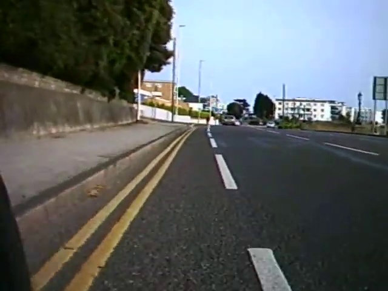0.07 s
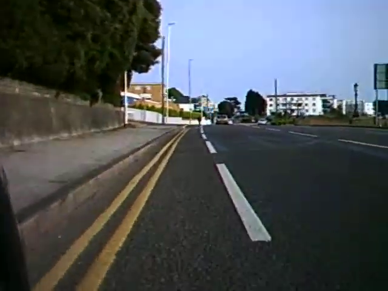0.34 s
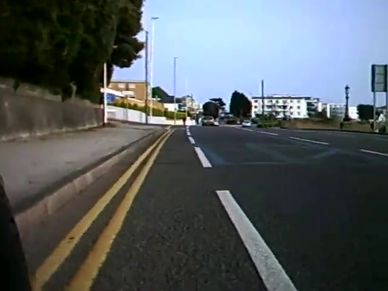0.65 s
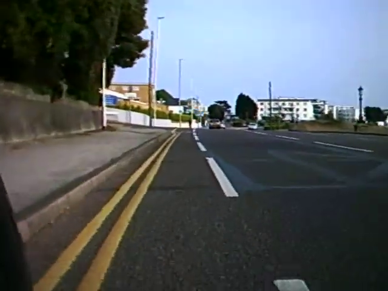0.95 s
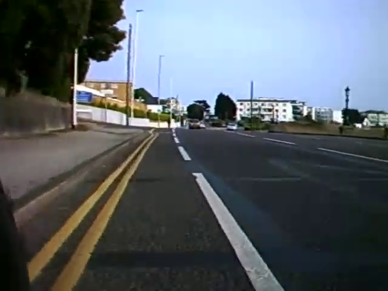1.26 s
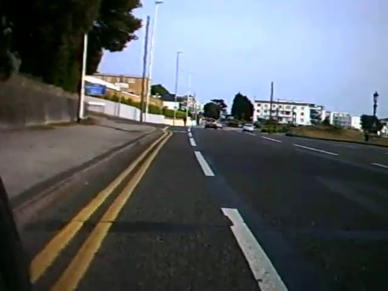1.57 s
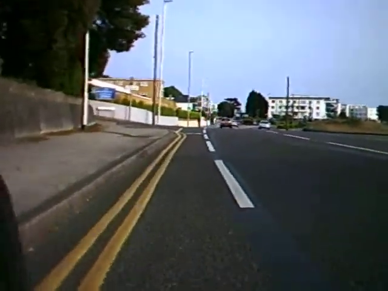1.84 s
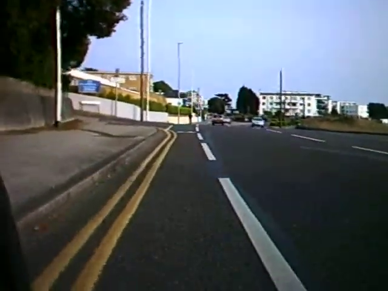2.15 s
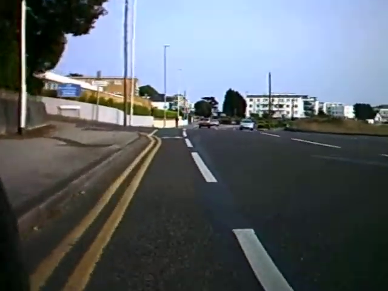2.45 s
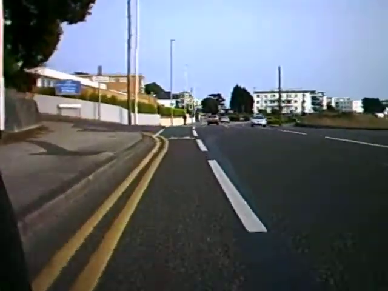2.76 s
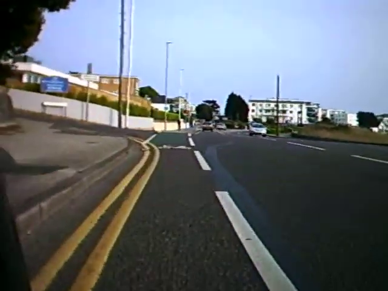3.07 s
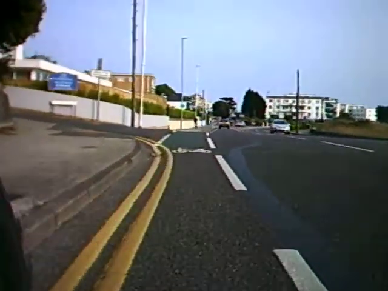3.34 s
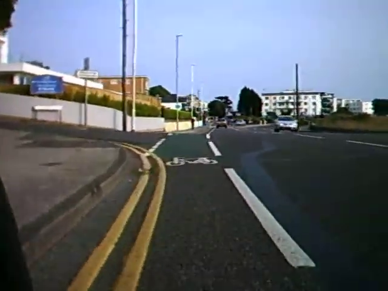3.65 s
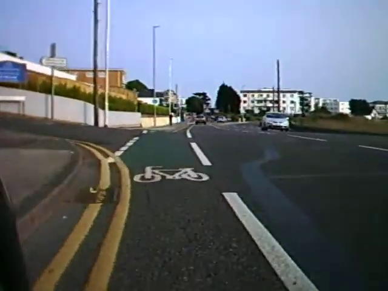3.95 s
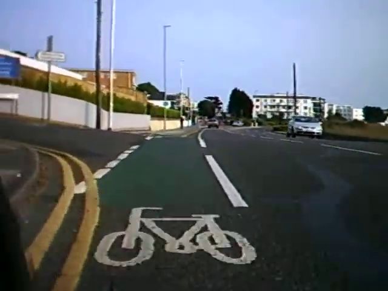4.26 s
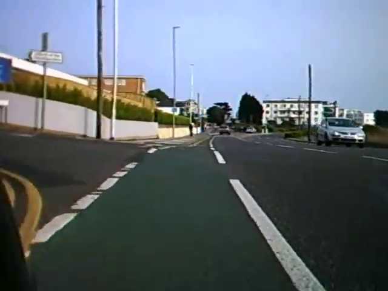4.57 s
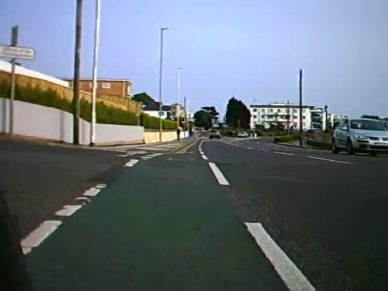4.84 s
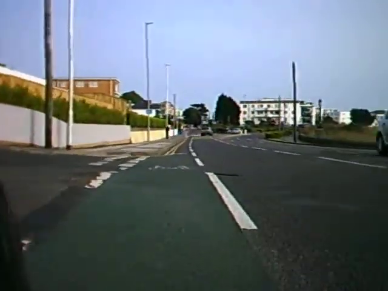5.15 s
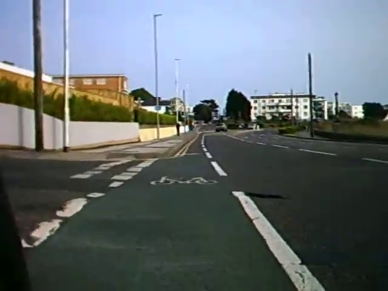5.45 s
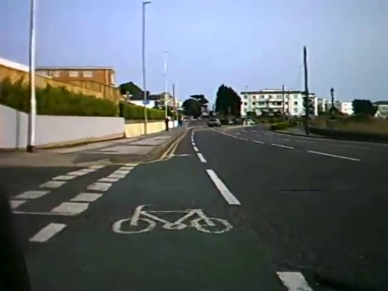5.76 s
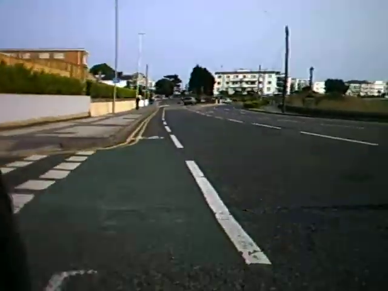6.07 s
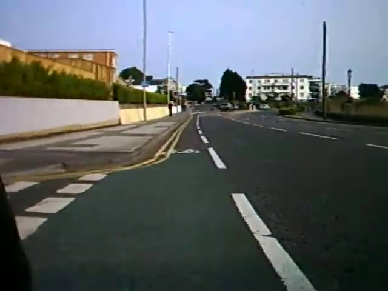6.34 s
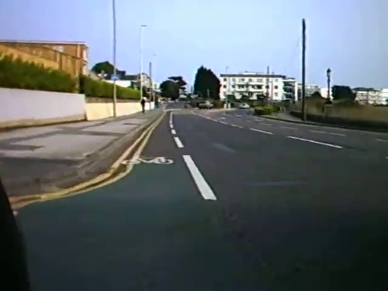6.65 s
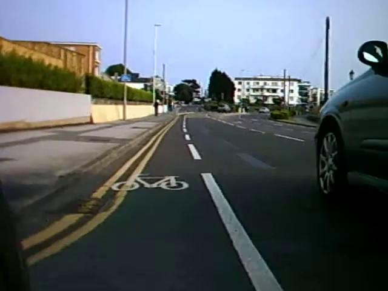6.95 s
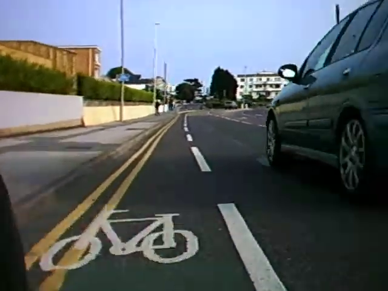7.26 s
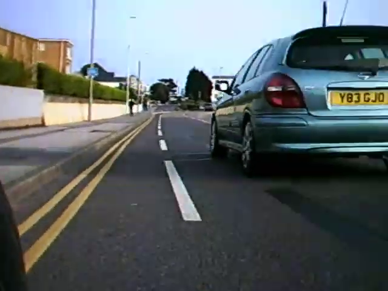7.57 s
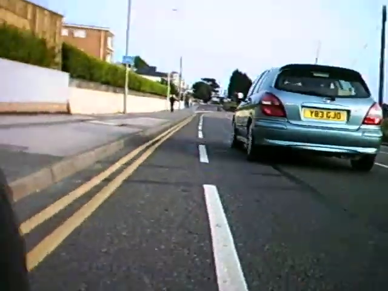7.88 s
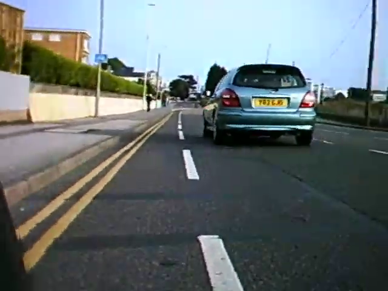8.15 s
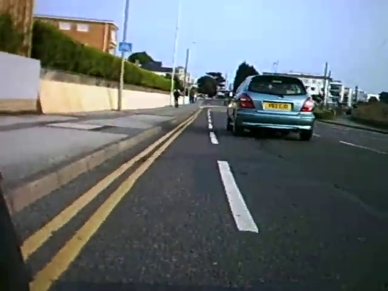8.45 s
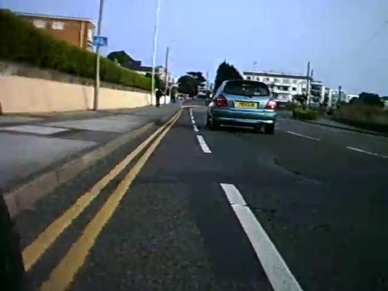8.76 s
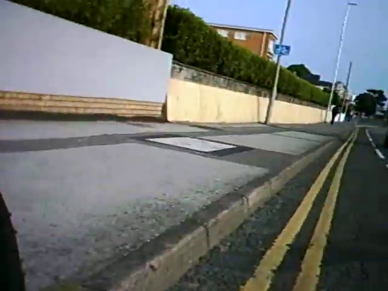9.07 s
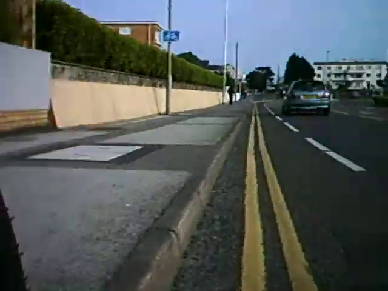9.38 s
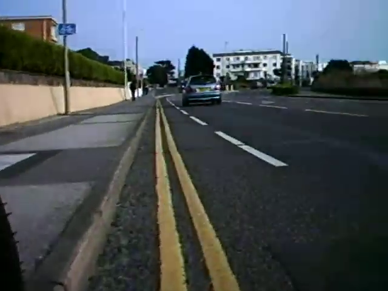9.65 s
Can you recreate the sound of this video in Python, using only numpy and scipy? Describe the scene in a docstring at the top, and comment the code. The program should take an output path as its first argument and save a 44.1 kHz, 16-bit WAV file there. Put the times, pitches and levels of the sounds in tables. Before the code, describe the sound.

A bicycle rumbles over rough asphalt with wind on the microphone, knocking and squeaking over bumps, then a brake rubs.

```python
"""A bicycle rolls on asphalt, a small camera fixed to its frame. From the start, road grain bounces the
tyres, shakes the frame and rings the camera case; wind buffets the microphone. From about 1 s, bumps
bring ticks, jolts and later knocks, and the camera mount squeaks, most densely at 6-7 s.
From 7.9 s a brake pad rubs the rim, its tones sinking as the wheel slows.
The narrow-band microphone saturates on the loudest peaks."""
import sys
import numpy as np
from scipy.fft import rfft, irfft, next_fast_len
from scipy.io import wavfile
from scipy.ndimage import map_coordinates

SR = 44100
rng = np.random.default_rng(int(sys.argv[2]) if len(sys.argv) > 2 else 0)


def store_wav(level_fs):
    """Save 16-bit WAV to argv[1]."""
    pcm = np.round(np.clip(np.atleast_2d(level_fs), -1, 1) * 32767)
    wavfile.write(sys.argv[1], SR, pcm.T.astype(np.int16))


N = 432621
T = np.arange(N) / SR

# noise spectra: (frequency [Hz], density [dB])
WIND_SPECTRUM = [(8, -16), (18, -3), (30, -5), (55, -0.5), (120, -13), (300, -37)]
TICK_SPECTRUM = [(900, -26), (1400, 5.5), (2000, -1), (2500, 2.5), (3000, 5.5), (4200, -9.5), (5000, -40)]
PAD_SPECTRUM = [(500, -47), (850, -8), (914, -10), (984, -6), (1150, -8), (1370, -7), (1590, -9),
                (1640, -22), (1830, -32.5), (2270, -24.5), (2580, -23.5), (2830, -18.5), (3130, -27),
                (3430, -23), (4160, -36), (5410, -87.5), (9150, -120)]
TYRE_SPECTRUM = [(42, -40.5), (57, -19), (65, -5.5), (71, 6.5), (79, 1), (90, -1), (105, -11.5),
                 (140, -18.5), (250, -52.5)]
FRAME_SPECTRUM = [(70, -38.5), (112, -5.5), (138, -4.5), (155, 0), (172, -1), (200, -5.5), (235, -6.5),
                  (300, -13), (345, -10.5), (385, -6), (440, -10.5), (510, -21.5), (900, -55)]
ROAD_SPECTRUM = [(250, -26.5), (500, -4.5), (640, 3.5), (780, 1.5), (890, -8.5), (1300, -14.5),
                 (1850, -23.5), (4000, -42)]
CASE_SPECTRUM = [(800, -44), (950, -19.5), (1070, -7), (1180, 2.5), (1310, 0.5), (1420, -10), (1560, -23),
                 (1850, -36), (2050, -32.5), (2500, -33.5), (2830, -25), (3100, -33), (3400, -32),
                 (4200, -57.5)]
# resonances: (frequency [Hz], width [Hz], gain [dB])
JOLT_MODES = [(75, 14, -1.5), (152, 20, 4), (400, 83, -6.5)]
CASE_MODES = [(483, 100, -7), (1158, 110, 10.5), (1320, 140, 5), (1880, 47, -11), (2470, 150, -12),
              (2870, 92, -8), (3260, 130, -18)]
MOUNT_MODES = [(982, 22, 3.5), (1433, 55, 0), (2240, 28, -10), (2320, 62, -6), (2710, 210, -13.5),
               (3880, 190, -26.5)]
RIM_MODES = [(390, 70, -11.5), (998, 29, 1), (1119, 106, 4), (1330, 135, 1.5), (1506, 51, -13),
             (1986, 60, -20.5), (2310, 91, -17.5), (2825, 110, -16.5), (3387, 110, -19.5)]
# gusts on the microphone: (middle [s], length [s], level [dB])
WIND_GUSTS = [(1.49, .7, -38.5), (6.025, .2, -28), (6.533, 1, -28.5), (9.591, .8, -39)]
# impacts over bumps: (time [s], level [dB])
FRAME_JOLTS = [(1.292, -9), (3.191, -4.5), (3.213, -7.5), (4.561, -13.5), (6.022, -19.5), (6.136, -17.5),
               (6.425, -16), (6.62, -14.5), (6.78, -13.5), (9.12, -9), (9.43, -7.5)]
CASE_KNOCKS = [(3.039, 1), (3.2223, 3.5), (3.2264, -1.5), (3.376, -13.5), (6.012, -13.5), (6.056, -9),
               (6.184, -8), (6.234, -12), (6.559, -17), (6.676, -9.5), (6.7895, -2), (6.803, -7),
               (6.882, -15)]
PART_TICKS = [(0.817, -32.5), (1.2945, -25.5), (1.489, -17.5), (3.036, -14.5), (3.153, -25.5), (5.973, -26),
              (6.0273, -16.5), (6.1506, -18.5), (6.1841, -15), (6.2326, -13.5), (6.6012, -21.5),
              (6.6363, -22.5), (6.655, -19.5), (6.6783, -24.5), (6.772, -20), (6.788, -19), (6.8057, -16),
              (6.8314, -24), (7.2323, -19.5), (7.343, -21.5), (7.5637, -26.5), (9.2986, -13.5)]
# slips of the mount: (time [s], length [s], pitch [Hz], level [dB])
MOUNT_SLIPS = [(1.32, 0.026, 1414, -10), (1.347, 0.028, 1448, -12.5), (1.373, 0.02, 1410, -14.5),
               (1.586, 0.019, 1388, -10.5), (1.645, 0.015, 1412, -17), (2.317, 0.017, 1415, -12.5),
               (2.35, 0.034, 1413, -7.5), (2.373, 0.032, 1383, -11), (2.402, .022, 1417, -11.5),
               (3.12, 0.014, 1458, -18), (3.908, 0.019, 1401, -13.5), (4.14, 0.018, 1413, -20),
               (4.955, 0.023, 1410, -13), (4.985, 0.022, 1425, -15), (5.92, .022, 1420, -9),
               (6.081, .026, 1438, -9), (6.144, 0.023, 1375, -5.5), (6.202, .02, 1426, -9.5),
               (6.323, 0.027, 1386, -14), (6.966, 0.023, 1402, -12), (7.684, 0.031, 1420, -7.5),
               (7.711, 0.03, 1405, -10)]
# rim ripples: (frequency at cruising speed [Hz], level [dB])
RIM_RIPPLES = [(560, 5.5), (700, 7), (1200, -4), (1330, -11.5), (1490, -7), (1630, -5.5), (1800, -21),
               (1950, -4.5), (2250, -8), (2750, -3.5), (3600, -3.5), (4700, -10.5)]
# radiation of the stiff rim: (frequency [Hz], gain [dB])
RIM_RADIATION = [(200, -15.5), (400, -2), (540, -11.5), (850, -9), (1000, 0.5), (1500, 3.5), (1780, 4),
                 (2100, 2.5)]
# brief harder grabs of the pad: (middle [s], length [s], rise [dB])
PAD_GRABS = [(8.212, 0.064, 5), (8.47, 0.082, 4.5), (8.921, 0.12, 3), (9, .05, 3), (9.148, .06, 3.5),
             (9.439, .09, 2.5)]
# asphalt coarseness: (time [s], vibration level [dB])
ASPHALT_GRAIN = [(0.0, -22), (0.53, -21), (2.82, -21.5), (2.93, -21), (4.31, -20.5), (5.46, -24.5),
                 (6.18, -21), (7.28, -23.5), (7.77, -21.5), (7.9, -21.5)]
# uneven road: (middle [s], length [s], tyre bounce [dB], frame hum [dB])
ROAD_HEAVES = [(0.429, .25, -28, -18), (1.049, .55, -23, -31.5), (3.634, .15, -35, -23.5),
               (4.539, .3, -25.5, -20), (6.199, .45, -17.5, -19.5), (6.632, .25, -16.5, -28),
               (7.202, 0.76, -25, -35.5), (7.892, 0.25, -30, -18), (8.398, 0.65, -23, -23),
               (9.051, 0.17, -29, -16), (9.179, .2, -20.5, -30.5)]

BRAKE_ON_S, BITE_S, SQUEEZE_S, SLOWING_PER_S = 7.865, .04, 1.2, .355


def amp(db):
    """Decibels to gain."""
    return 10 ** (np.asarray(db) / 20)


def unit(x):
    """Scale to rms 1."""
    return x / np.sqrt(np.mean(x ** 2) + 1e-20)


def wobble(knots_per_s):
    """Smooth random curve."""
    return map_coordinates(rng.standard_normal(int(N * knots_per_s / SR) + 4), [T * knots_per_s])


def swell(middle_s, length_s):
    """Half-cosine rise and fall, 0 to 1."""
    return np.cos(np.pi * np.clip((T - middle_s) / length_s, -.5, .5))


def filtered(x, response):
    """Apply a frequency response."""
    size = next_fast_len(N + 8192)
    return irfft(rfft(x, size) * response(np.fft.rfftfreq(size, 1 / SR)), size)[:N]


def colour(points):
    """Response through (frequency [Hz], gain [dB]) points, log frequency axis."""
    points_hz, db = np.transpose(points)
    return lambda hz: amp(np.interp(np.log(hz + 1), np.log(points_hz), db))


def body(modes):
    """Causal response of resonances, alternating in sign."""
    return lambda hz: sum(
        (-1) ** k * amp(db) * 1j * hz * width_hz / (mode_hz ** 2 - hz ** 2 + 1j * hz * width_hz)
        for k, (mode_hz, width_hz, db) in enumerate(modes))


def shaken(force, response):
    """Noise of strength force through a power-preserving response."""
    noise = rng.standard_normal(N)
    return filtered(noise * force, response) / np.std(filtered(noise, response))


def bursts(rows, t60_s):
    """Decaying forces from (time [s], level [dB]) rows."""
    force, age_s = np.zeros(N + SR), np.arange(SR // 4) / SR
    for time_s, db in rows:
        force[round(time_s * SR):][:len(age_s)] += amp(db - 60 * age_s / t60_s)
    return force[:N]


def saturate(x, top, hardness):
    """Round off peaks near top."""
    return x / (1 + np.abs(x / top) ** hardness) ** (1 / hardness)


def wheel_speed():
    """Share of cruising speed: steady, then falling linearly under the brake."""
    return np.clip(1 - SLOWING_PER_S * (T - BRAKE_ON_S), .05, 1)


def pad_contact():
    """The brake pad beds in, 0 to 1."""
    return np.clip((T - BRAKE_ON_S) / BITE_S, 0, 1)


def wind():
    """Headwind buffets the microphone in proportion to speed; gusts add on top."""
    headwind = amp(-42 + 1.2 * wobble(3.5)) * wheel_speed()
    gusts = sum(amp(db) * swell(middle_s, length_s) for middle_s, length_s, db in WIND_GUSTS)
    return shaken(np.hypot(headwind, gusts), colour(WIND_SPECTRUM))


def bumps():
    """Bumps jolt the frame through the tyres, knock and rattle the case, and make loose parts tick."""
    cushion = colour([(450, -2), (1500, -16.5)])
    jolt_force = amp(-2) * bursts(FRAME_JOLTS, t60_s=.13)
    jolts = shaken(jolt_force, lambda hz: body(JOLT_MODES)(hz) * cushion(hz))
    blows = np.zeros(N)
    for time_s, db in CASE_KNOCKS:
        blows[round(time_s * SR)] = amp(db + 21.5)
    knocks = filtered(blows, body(CASE_MODES))
    rattle = shaken(amp(-5) * bursts(CASE_KNOCKS, t60_s=.032), body(CASE_MODES))
    ticks = shaken(amp(-5) * bursts(PART_TICKS, t60_s=.021), colour(TICK_SPECTRUM))
    return jolts + knocks + rattle + ticks


def mount_squeaks():
    """The mount sticks and slips: an unsteady tone, its octave and resonant chatter."""
    rest_hz, jitter_hz = 1376.0, 22
    grip, pitch_hz = np.zeros(N), np.full(N, rest_hz)
    for time_s, length_s, hz, db in MOUNT_SLIPS:
        start, size = round(time_s * SR), round(length_s * SR)
        progress = (np.arange(size) + .5) / size
        grip[start:start + size] += amp(db) * np.sin(np.pi * progress ** .65)  # fast rise, slower fall
        pitch_hz[start:start + size] = hz
    phase = 2 * np.pi * np.cumsum(pitch_hz + jitter_hz * wobble(200)) / SR
    tone = (np.sin(phase) + amp(-26.5) * np.sin(2 * phase)) * amp(.7 * wobble(250))
    chatter = shaken(amp(-14.5) * grip, body(MOUNT_MODES))
    return amp(-0.6) * grip * tone + chatter


def brake():
    """The pad hisses and rings the rippled rim: louder with force, lower and fainter as it slows."""
    touch_db, full_db, swing_db, ripple_db, hiss_db = -22, -9, 2, -14, -10.5
    speed = wheel_speed()
    force = np.interp(T, [BRAKE_ON_S, BRAKE_ON_S + SQUEEZE_S], amp([touch_db, full_db]))
    grab_db = sum(db * swell(middle_s, length_s) for middle_s, length_s, db in PAD_GRABS)
    friction = pad_contact() * force * speed * amp(grab_db)
    travel_s = np.cumsum(speed) / SR  # distance over cruising speed
    tones = sum(amp(db + swing_db * wobble(7)) * np.sin(2 * np.pi * hz * travel_s + 0.8 * wobble(45))
                for hz, db in RIM_RIPPLES)
    scrape = (amp(ripple_db) * tones + rng.standard_normal(N)) * amp(1.4 * wobble(70))
    ring = filtered(scrape, lambda hz: body(RIM_MODES)(hz) * colour(RIM_RADIATION)(hz))
    ring /= np.std(ring[T > BRAKE_ON_S])
    hiss = shaken(amp(hiss_db) * friction, colour(PAD_SPECTRUM))
    return friction * ring + hiss


def rolling():
    """Stones in the asphalt bounce the tyres, shake the frame and ring the case, more on coarse road."""
    tyre_db, frame_db, hum_db, road_db, case_db = -27.5, -21.5, -31.5, -32, -23.5
    bend_hz, bend_width_hz = 151.9, 22  # main bending mode of the frame
    dive_db = 2  # braking loads the front wheel
    grain_db = np.interp(T, *np.transpose(ASPHALT_GRAIN))
    coarse, speed = amp(grain_db - grain_db.mean()), wheel_speed()
    frame_drive = coarse * amp(dive_db * pad_contact()) * speed ** 0.91
    stones = coarse * unit(amp(1.52 * wobble(160) + 0.95 * wobble(25)))
    bounce = sum(amp(db) * swell(middle_s, length_s) for middle_s, length_s, db, _ in ROAD_HEAVES)
    bend = sum(amp(db) * swell(middle_s, length_s) for middle_s, length_s, _, db in ROAD_HEAVES)
    tyre = shaken(np.hypot(amp(tyre_db) * coarse, bounce), colour(TYRE_SPECTRUM))
    frame = shaken(amp(frame_db) * frame_drive, colour(FRAME_SPECTRUM))
    hum_force = np.hypot(amp(hum_db) * frame_drive, bend)
    hum = shaken(hum_force, lambda hz: 1 / (1 + (2 * (hz - bend_hz) / bend_width_hz) ** 2))
    road = shaken(amp(road_db) * stones * speed ** 0.75, colour(ROAD_SPECTRUM))
    case = shaken(amp(case_db) * stones * speed ** 0.95, colour(CASE_SPECTRUM))
    return tyre + frame + hum + road + case


def scene():
    """Mono sum at the camera."""
    return (rolling() + wind() + brake() + mount_squeaks() + bumps())[None]


def record(dry):
    """Saturating narrow-band microphone, clipping input, band limit."""
    mic_edge_hz, band_limit_hz = 4050, 15800
    saturated = saturate(dry[0], top=.76, hardness=7)
    narrow = filtered(saturated, lambda hz: 1 / np.sqrt(1 + (hz / mic_edge_hz) ** 60))
    clipped = saturate(narrow, top=.71, hardness=40)
    return filtered(clipped, lambda hz: hz < band_limit_hz)[None]


dry = scene()
out = record(dry)
store_wav(out)
```